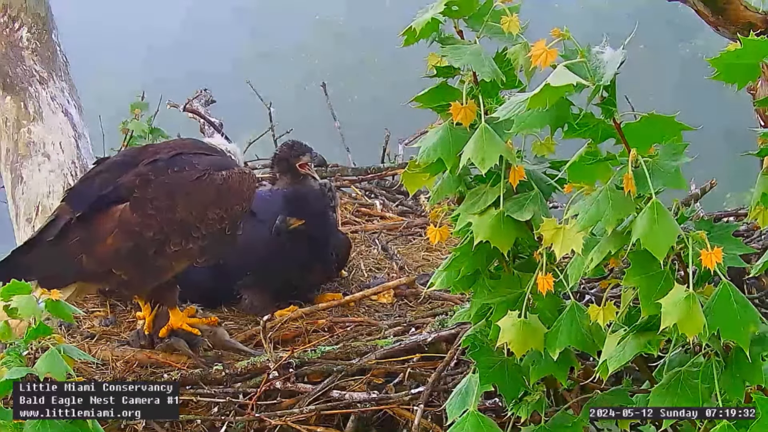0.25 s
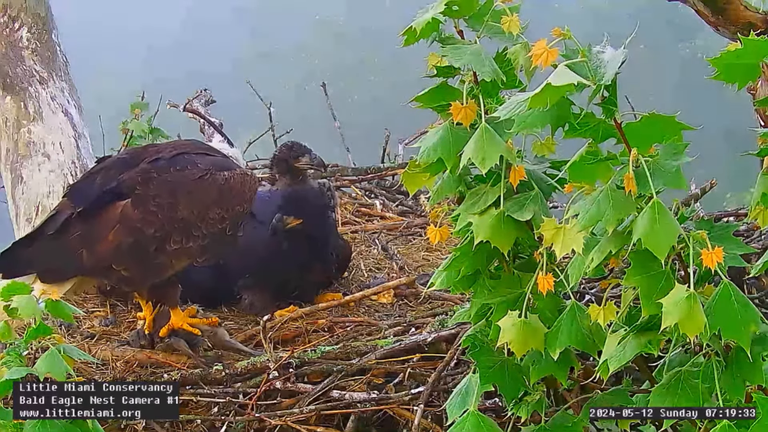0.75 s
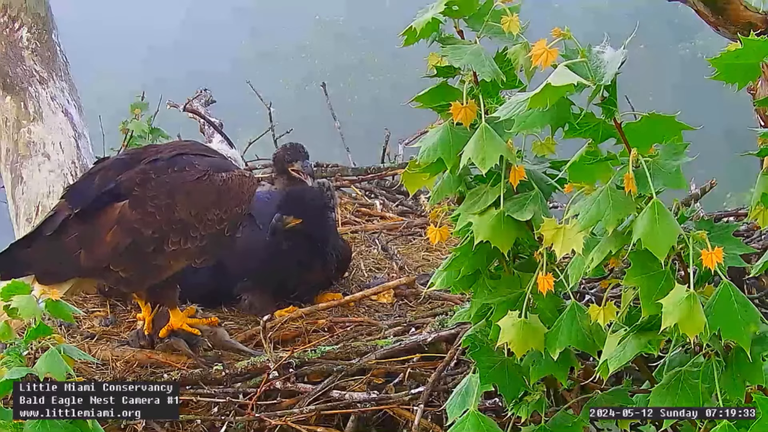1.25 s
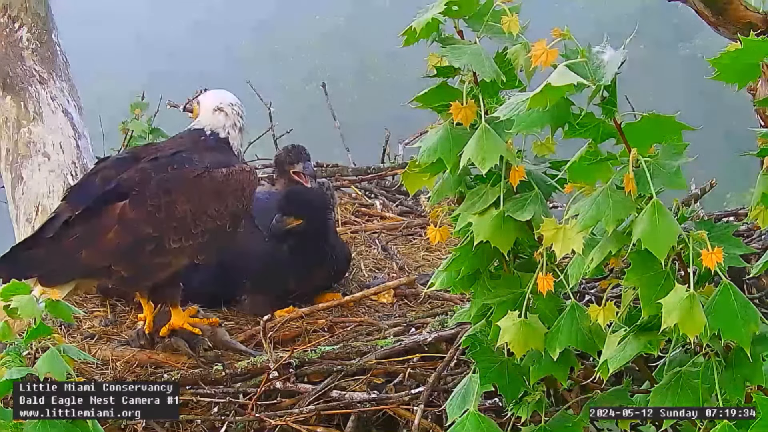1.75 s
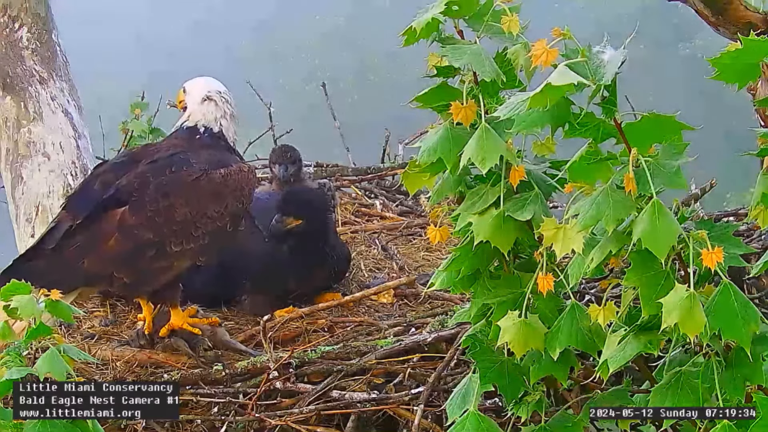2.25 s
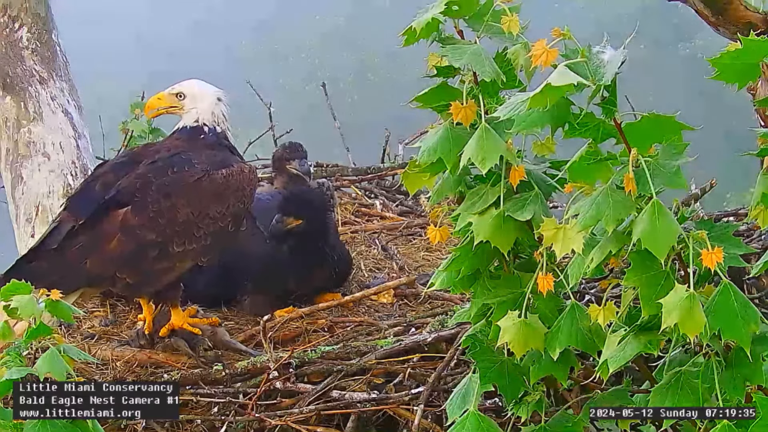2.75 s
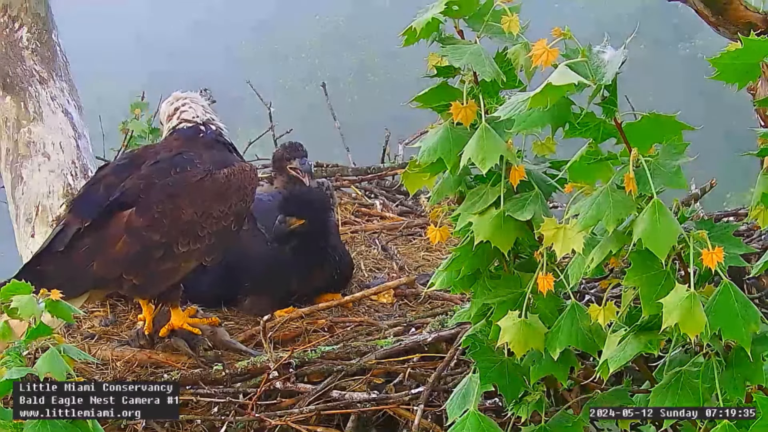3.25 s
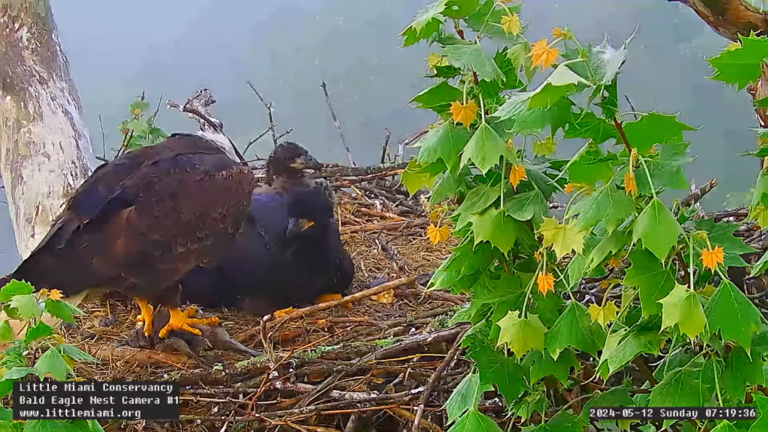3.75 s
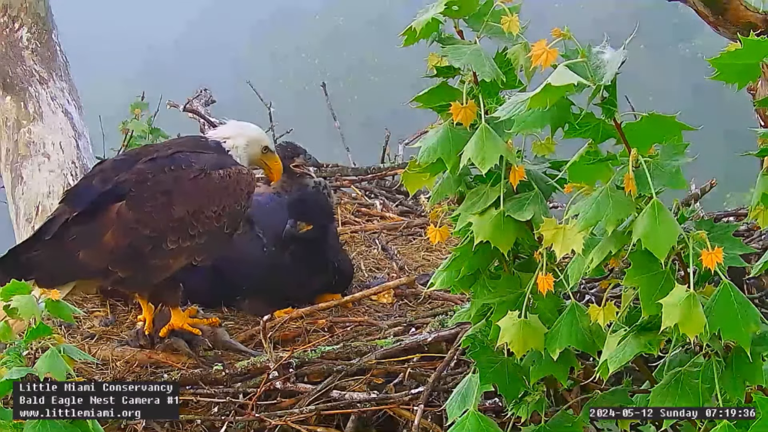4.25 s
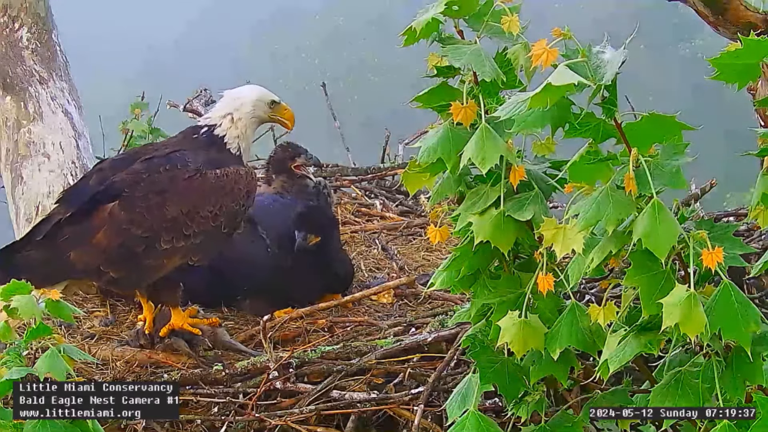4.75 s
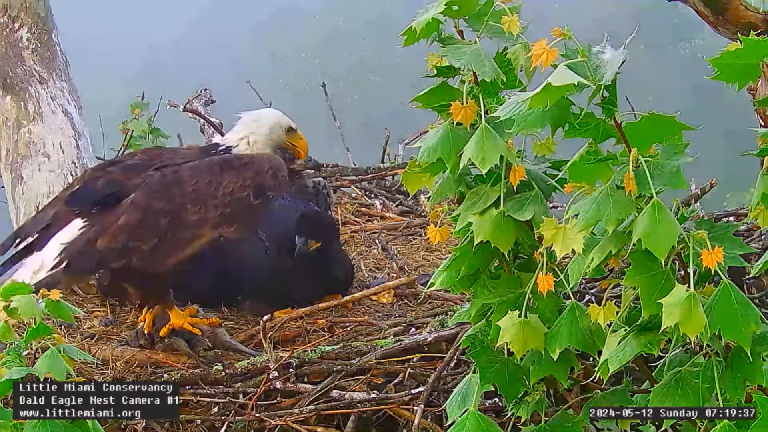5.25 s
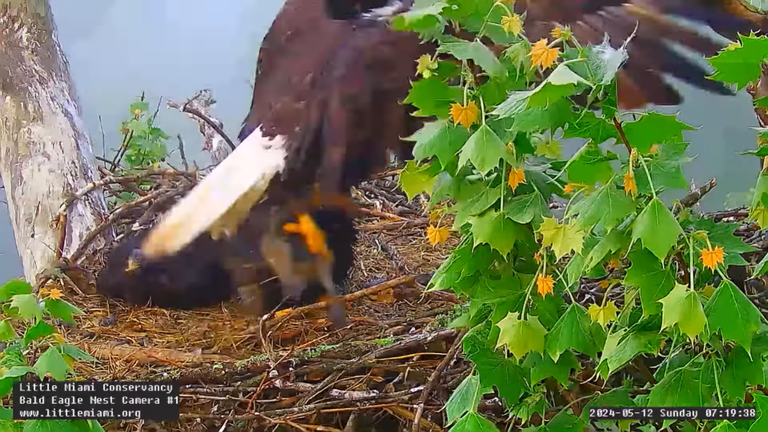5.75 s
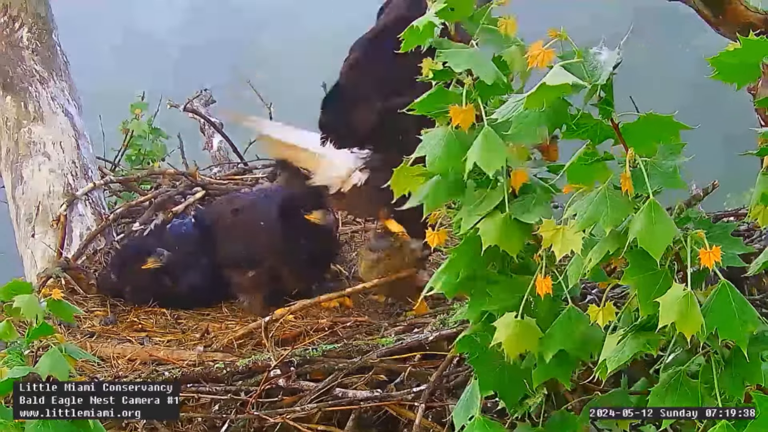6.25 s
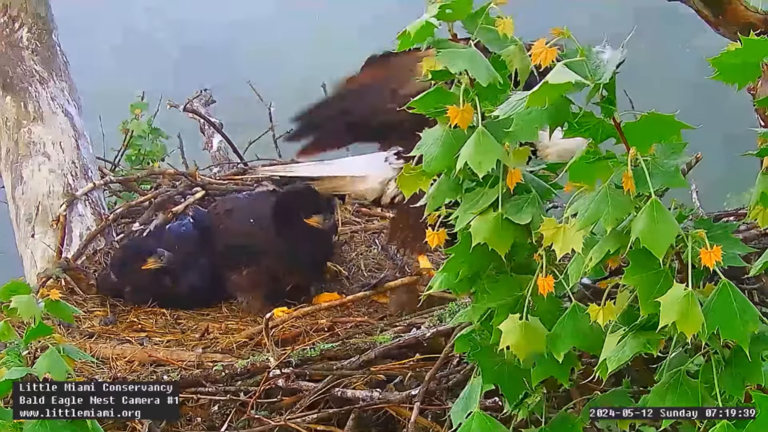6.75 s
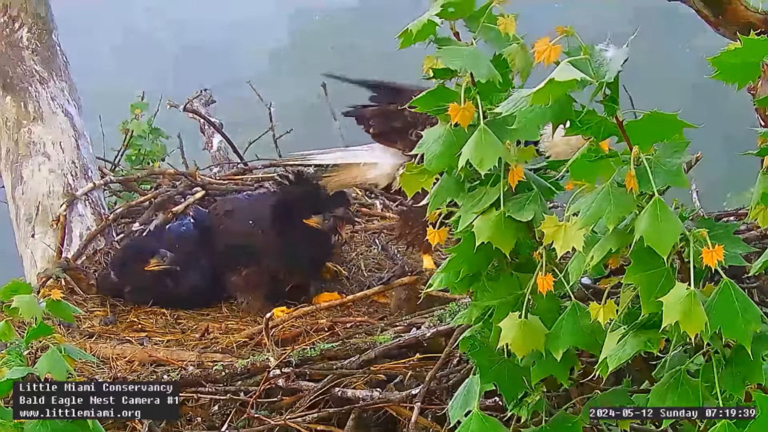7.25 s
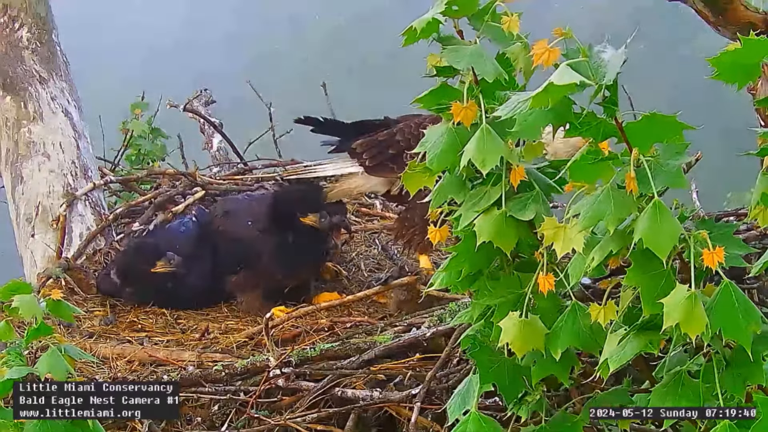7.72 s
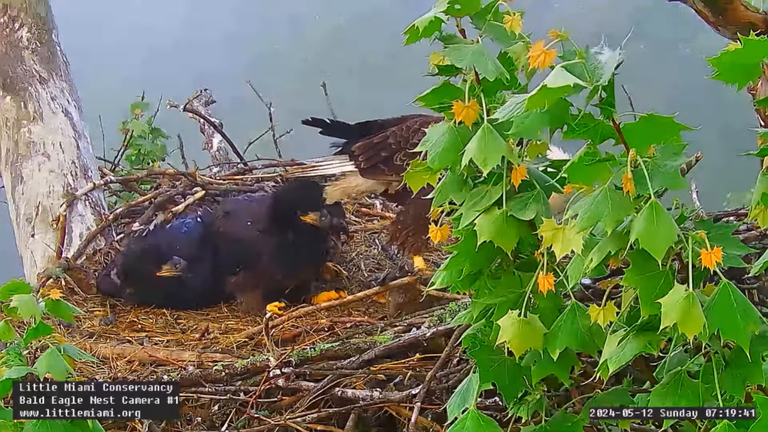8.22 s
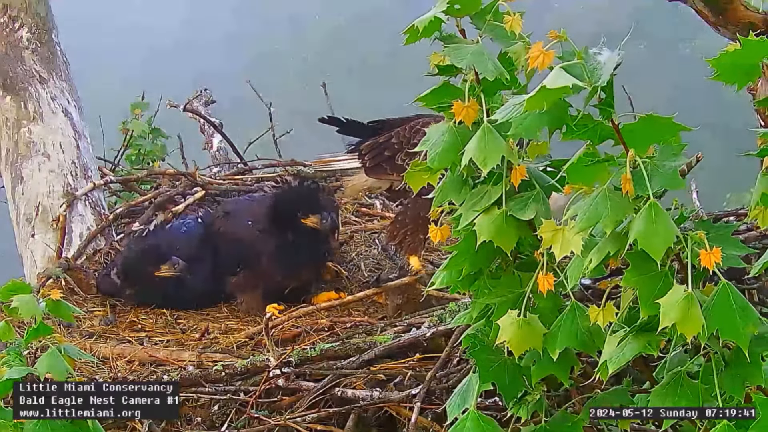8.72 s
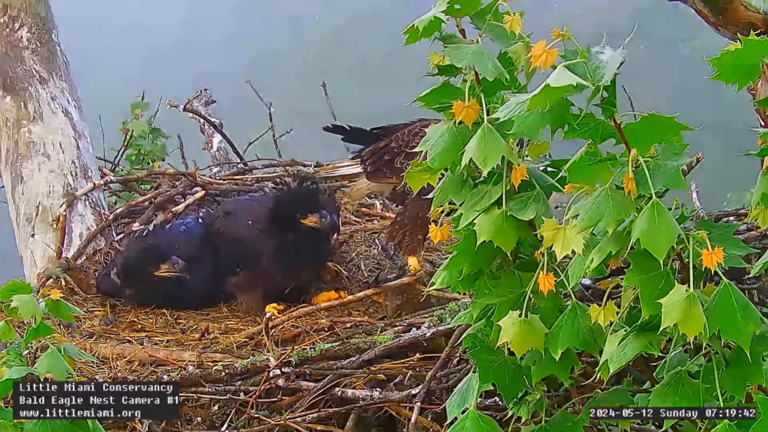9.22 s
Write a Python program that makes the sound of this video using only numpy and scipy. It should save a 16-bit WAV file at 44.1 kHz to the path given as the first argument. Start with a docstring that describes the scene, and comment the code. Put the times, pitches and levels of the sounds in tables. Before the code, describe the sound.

A falling eaglet cry opens, followed by repeated bursts of beating, squealing notes, long whines and held cries that drop abruptly. A quick songbird trill rings lightly through the trees around the middle. Small crisp scrapes of talons on twigs follow, then louder, hoarser screams overlap and push higher. Everything is outdoors, the eagles close to the microphone, with a very soft hiss of leaves behind.

```python
"""Young eagles beg from a treetop nest, opening on a plunging cry: short glides and upward cracks lead into
beating two-voiced notes, long whines and held cries. Past four seconds a small songbird trills in the wood.
Later an adult bird scuffs the nest's sticks, and four raspy screams climb to the end.
Calls are wavering sine tones with noisy sidebands, the trill is quick downward sweeps, the scuffs are shaped
noise; a faint hiss of foliage runs under it all, and the nest microphone cuts the extreme treble."""
import sys
import numpy as np
from scipy import signal
from scipy.fft import rfft, irfft, next_fast_len
from scipy.io import wavfile
from scipy.ndimage import uniform_filter1d, map_coordinates

SR = 44100
rng = np.random.default_rng(int(sys.argv[2]) if len(sys.argv) > 2 else 0)


def inscribe(sig):
    """Save sig as 16-bit PCM at rate SR to the path in sys.argv[1].

    A 1-D sig is mono; a 2-D sig holds one channel per row.
    Samples are clipped to [-1, 1] before scaling.
    """
    pcm = np.round(np.clip(np.atleast_2d(sig).T, -1, 1) * 32767)
    wavfile.write(sys.argv[1], SR, pcm.astype(np.int16))


N = 418068

# Slow level of the foliage hiss. Each row: time in seconds, level in dB before the hiss gain.
HISS_LEVELS = [(0, -67.5), (.36, -74), (.7, -70), (1.7, -69), (2.401, -65.5), (3.201, -69), (4.198, -65.5),
               (5.203, -65), (6.501, -64), (7.499, -70.5), (8.1, -63), (8.598, -71.5), (9.48, -70)]
# Colour of the foliage hiss. Each row: frequency in Hz, relative density in dB per Hz.
HISS_SPECTRUM = [(20, -25.5), (55, -16), (130, -35), (550, -43.5), (1000, -35), (1300, -37), (1700, -18.5),
                 (2200, -9), (3100, -5.5), (4500, -8.5), (6000, -0.5), (7600, 1), (8400, -14.5)]
# How long the trees' echo rings. Each row: frequency in Hz, time to fall 60 dB in seconds.
WOOD_DECAY = [(2000, 0.27), (5000, 0.44), (9000, 0.071)]
# Path of the songbird's trill. Each row: time in seconds, centre of the sweep in Hz.
TRILL_PITCH = [(4.2, 5070), (4.32, 5320), (4.44, 5720), (4.55, 6320), (4.85, 6440), (5.06, 6370)]
# Wings and talons scuffing the sticks. Each row: peak time in seconds, level in dB,
# time from the peak down to 1/e in seconds.
SCUFFS = [(6.404, -56, 0.055), (6.487, -39.5, 0.017), (6.534, -52, 0.023), (6.642, -52, 0.022),
          (6.97, -51, 0.025), (7.254, -48, 0.036)]
# Colour of the dry sticks. Each row: frequency in Hz, relative density in dB per Hz.
STICK_SPECTRUM = [(500, -54), (950, -39.5), (1400, -35.5), (1900, -15), (2250, 3.5), (2800, -7),
                  (3600, 1.5), (8000, -23)]
# Cracked upward slurs that open the calls. Each row: start in seconds, length in seconds, first pitch in Hz,
# last pitch in Hz, fundamental in dB, octave in dB, fade over the note in dB (negative grows).
YELPS = [ (0.43, 0.035, 3220, 4050, -74, -39, 11), (0.518, 0.17, 3650, 3800, -43.5, -45.5, 6),
         (1.853, 0.035, 3110, 4120, -65, -37, 9), (1.954, 0.056, 3686, 3830, -36.5, -30.5, 2),
         (3.238, 0.054, 3200, 3980, -80, -38, 11.5), (3.281, 0.26, 3245, 3740, -40.5, -29, 27.5),
         (3.517, 0.13, 3680, 3934, -43, -45, -1), (4.735, 0.36, 3665, 3800, -56, -42.5, 3),
         (6.196, 0.185, 3594, 3870, -50, -42, 1.5), (7.626, 0.061, 3460, 3950, -43, -44.5, -2.5),
         (8.709, 0.026, 3250, 3390, -44.5, -46.5, 4.5), (8.727, 0.13, 3010, 3460, -45, -60, -9),
         (8.843, 0.063, 3303, 3680, -25, -25, 16.5), ]
# Both syrinx sides sounding together. Each row: start in seconds, length in seconds, first pitch in Hz,
# last pitch in Hz, level in dB, trend in dB per second, attack in seconds, gap between the sides in Hz, rasp 0-1.
DUETS = [ (0.0, 0.29, 4635, 4380, -45.5, -65, 0.00067, 672, 0.76),
         (0.51, 0.57, 3910, 4575, -29.5, -2, 0.1, 210, 0.23),
         (2.0, 0.32, 4077, 4540, -31, 5.5, 0.0049, 203.1, 0.52),
         (3.6, 0.42, 4230, 4623, -37, 14.5, 0.026, 203, 0.25),
         (4.57, 0.35, 3074, 3500, -42.5, 3, 0.11, 201, 0.08),
         (4.88, 0.24, 3485, 3880, -45.5, -10.5, 0.012, 297, 0.06),
         (4.89, 0.63, 4116, 4786, -34.5, 4, 0.09, 265, 0.27),
         (8.92, 0.71, 4150, 4650, -37, -29.5, 0.02, 270, 0.18), ]
# Short glides between and within the calls, some soft, some loud or hoarse: peeps, call ends and upper strands.
# Each row: start in seconds, length in seconds, first pitch in Hz, last pitch in Hz,
# mid-note level in dB, rasp 0-1.
SHORT_GLIDES = [ (0.467, 0.12, 4060, 4030, -51, 0.34), (1.05, 0.1, 4920, 4820, -42.5, 0.55),
                (1.146, 0.08, 4650, 4594, -31.5, 0.63), (1.548, 0.12, 4050, 3270, -58.5, 0.7),
                (1.691, 0.14, 3250, 2950, -56, 0.45), (1.807, 0.41, 3200, 3490, -49.5, 0.38),
                (1.893, 0.15, 4070, 4250, -46.5, 0.25), (2.124, 0.084, 3650, 3030, -48.5, 0.8),
                (2.296, 0.12, 3020, 3490, -46.5, 0.5), (2.266, 0.14, 4580, 4760, -37, 0.27),
                (2.354, 0.13, 2850, 2286, -63.5, 0.4), (3.562, 0.038, 3800, 3225, -30.5, 0.17),
                (5.722, 0.18, 2520, 2850, -57, 1), (6.019, 0.42, 3130, 2913, -55.5, 1),
                (6.08, 0.12, 4150, 4240, -43, 0.11), (6.286, 0.035, 3950, 2910, -39.5, 0.44),
                (6.33, 0.32, 3500, 3850, -48, 1), (6.653, 0.13, 6010, 5500, -44, 0.68),
                (6.798, 0.15, 3150, 3170, -47, 0.37), (6.893, 0.27, 5200, 5390, -46, 0.5),
                (7.011, 0.11, 3180, 3530, -37, 0.47), (7.051, 0.13, 5450, 5950, -39, 0.2),
                (7.104, 0.15, 3850, 4190, -42.5, 0.5), (7.931, 0.26, 5350, 6300, -43, 0.1),
                (7.925, 0.18, 5250, 5400, -36, 1), (8.236, 0.05, 2730, 2980, -56.5, 0.82),
                (8.477, 0.028, 3654, 2990, -30, 0.29), (9.123, 0.12, 5200, 5660, -38, 0.33),
                (9.301, 0.24, 3080, 2750, -70, 0.74), ]
# Long thin whines. Each row: start in seconds, length in seconds, first pitch in Hz, last pitch in Hz,
# first level in dB, last level in dB, midway dip in dB, rasp 0-1, final droop in Hz, plunge in seconds.
WHINES = [ (2.585, 0.99, 4223, 4186, -33, -39.5, 11.5, 0.21, 624.5, 0.045),
          (5.441, 0.41, 4240, 4230, -32, -41, -0.5, 0.34, 0.5, 0),
          (5.83, 0.455, 4394, 4197, -43, -42, 11, 0.12, 199, 0.04),
          (7.165, 0.66, 4263, 4567, -30.5, -28, 13.5, 0.27, 1.5, 0),
          (8.836, 0.71, 3560, 3700, -30, -45.5, 7, 0.15, 4, 0.028), ]
# The four long screams, one curve each. Each row of a curve: time in seconds, pitch in Hz, level in dB.
SCREAM_CURVES = [
    [(6.38, 4050, -35.5), (6.43, 4410, -35.5), (6.552, 4230, -40.5), (6.65, 4550, -32.5),
     (6.808, 4690, -35.5), (6.942, 4690, -30.5), (7.134, 4884, -30), (7.184, 4690, -23)],
    [(7.68, 3980, -27.5), (7.72, 4210, -22), (7.746, 4360, -24.5), (7.95, 4640, -21), (8.186, 4580, -36),
     (8.215, 4530, -32)],
    [(7.99, 5220, -33.5), (8.006, 5140, -29.5), (8.068, 5230, -42.5), (8.106, 5481, -24.5),
     (8.114, 5190, -25), (8.192, 5464, -16), (8.348, 5605, -22.5), (8.436, 5430, -20), (8.456, 5219, -27.5)],
    [(8.89, 4220, -33.5), (8.946, 4750, -39), (9.19, 4990, -35), (9.222, 5070, -42), (9.262, 5310, -25),
     (9.388, 5160, -27.5), (9.475, 5344, -27.5)],
]
# Voices of the screams. Each row: register change in seconds, rasp before 0-1, rasp after 0-1,
# side tone pitch as a ratio, side tone level relative to the scream in dB.
SCREAM_VOICES = [(7.159, 0.32, 0.4, 1.15, -13.5), (7.97, 0.12, 0.5, 1.24, -34),
                 (8.15, 0.5, 0.03, 1.178, -20.5), (9.2, 0.37, 0.12, 1.137, -26)]
# The held cry that crowns a begging call. Each row: start in seconds, length in seconds, first pitch in Hz,
# sag in Hz per second, mid-cry level in dB, opening rasp 0-1.
CRIES = [ (0.0, 0.27, 5000, 903, -57, 0.16), (1.168, 0.2385, 4808, 950, -26.5, 0.38),
         (2.412, 0.3205, 4690, 450, -23.5, 0.45), (3.953, 0.172, 4724, 823, -27.5, 0.4),
         (5.403, 0.25, 4842, 456, -28, 0.65), ]

TRILL_START_S, TRILL_COUNT = 4.1987, 18
# the gap between syllables shrinks from slow to fast, half-way by the gap numbered TRILL_HURRY
TRILL_SLOW_S, TRILL_FAST_S, TRILL_HURRY = 0.0602, 0.048, 3.4
TRILL_DB, TRILL_SWELL_DB, TRILL_SWELL_S = -26.5, 12.5, 0.16  # swells towards TRILL_DB
EDGE_DB = 21  # depth of the soft attacks, the duet releases and the side tone's entry
DUET_RELEASE_S = 0.015
EASE = 1.45  # a glide slows as it nears its goal
TAPER_DB = 7  # the ends of a short glide lie this far under its middle
DROOP_S = 0.031  # a whine sinks over its last moments
REGISTER_S = 0.048  # how quickly a scream changes register
CRY_ATTACK_S, CRY_SWELL_DB, CRY_CLEAR_S = 0.0093, 4.5, 0.24  # starts hoarse, clears as it grows
DROP_S = 0.046  # plunge that ends a cry or scream
DROP_TO_HZ, DROP_FADE_DB, DROP_RASP = 2850, 30.5, 0.95  # state at the foot of any plunge
TOP_HZ = 8750  # the microphone's band limit


def amp(db):
    """Decibels to gain."""
    return 10 ** (np.asarray(db) / 20)


def unit(x):
    """x at rms 1."""
    return x / np.sqrt(np.mean(np.abs(x) ** 2) + 1e-20)


def along(points, hz):
    """Read (Hz, value) points on a log frequency axis."""
    f, v = np.transpose(points)
    return np.interp(np.log(hz + 1), np.log(f + 1), v)


def filtered(x, response):
    """Shape the spectrum of x by a response of frequency."""
    m = next_fast_len(N + 8192)
    return irfft(rfft(x, m) * response(np.fft.rfftfreq(m, 1 / SR)), m)[:N]


def noise(spectrum):
    """Coloured noise of rms 1."""
    return unit(filtered(rng.standard_normal(N), lambda hz: amp(along(spectrum, hz))))


def wobble(rate, n):
    """A smooth random curve of n samples, with rate knots a second."""
    return map_coordinates(rng.standard_normal(int(n * rate / SR) + 4), [np.arange(n) * rate / SR])


def add(out, s, sound):
    """Mix a sound into out at time s."""
    part = out[max(round(s * SR), 0):][:len(sound)]
    part += sound[:len(part)]


def foliage(level_db=10):
    """The wood's faint hiss: coloured noise whose level slowly shifts and lightly flutters."""
    db = np.interp(np.arange(N) / SR, *np.transpose(HISS_LEVELS))
    drift_db = 0.9 * wobble(9, N)
    return amp(level_db + db + drift_db) * noise(HISS_SPECTRUM)


def echo(x, delay=0.0027):
    """Scatter from trunks and leaves: a noise tail in which each frequency dies at its own speed."""
    hz, t, z = signal.stft(rng.standard_normal(SR // 2), SR, nperseg=256)
    decay = amp(-60 * t / along(WOOD_DECAY, hz)[:, None])
    tail = signal.istft(z * decay, SR, nperseg=256)[1]
    tail = np.pad(tail / np.linalg.norm(tail), (round(delay * SR), 0))
    return signal.fftconvolve(x, tail)[:N]


def syllables():
    """The trill quickens and swells: time in seconds and level in dB of each syllable."""
    slowness = 1 / (1 + (np.arange(TRILL_COUNT - 1) / TRILL_HURRY) ** 4)
    gaps = TRILL_FAST_S + (TRILL_SLOW_S - TRILL_FAST_S) * slowness
    t = np.append(0, np.cumsum(gaps))
    return zip(TRILL_START_S + t, TRILL_DB - TRILL_SWELL_DB * np.exp(-t / TRILL_SWELL_S))


def songbird(half_sweep_hz=1836, half_length=0.0065, scatter_s=0.007, scatter_db=-3, wet_db=-0.5):
    """A trill of very quick downward sweeps, blurred by nearby leaves and by the wood."""
    out = np.zeros(N)
    u = np.linspace(-1, 1, round(2 * half_length * SR))
    swell = np.cos(np.pi / 2 * u) ** 4
    t = np.arange(SR // 40) / SR
    for s, db in syllables():
        hz = np.interp(s, *np.transpose(TRILL_PITCH)) - half_sweep_hz * u
        sweep = swell * np.sin(2 * np.pi * np.cumsum(hz) / SR)
        leaves = rng.standard_normal(len(t)) * np.exp(-t / scatter_s)
        paths = (t == 0) + amp(scatter_db) * leaves / np.linalg.norm(leaves)  # direct sound, then scatter
        # the sweep is centred 3 ms after the syllable's time
        add(out, s - half_length + 0.003, amp(db) * signal.fftconvolve(sweep, paths))
    return out + amp(wet_db) * echo(out)


def scuffs(grain_db=4):
    """Each stroke drags over dry sticks: a bell-shaped swell of grainy coloured noise."""
    t = np.arange(N) / SR
    strokes = sum(amp(db) * np.exp(-((t - s) / length) ** 2) for s, db, length in SCUFFS)
    grain = amp(grain_db * wobble(300, N))
    return strokes * unit(noise(STICK_SPECTRUM) * grain)


def clock(length):
    """A note's time in seconds and its progress 0-1, per sample."""
    t = np.arange(round(length * SR)) / SR
    return t, t / length


def gate(n):
    """Soft 4 ms edges for a note of n samples."""
    t = np.arange(n) / SR
    return np.sin(np.pi / 2 * np.clip(np.minimum(t, t[-1] - t) / 0.004, 0, 1)) ** 2


def glide(first, last, u):
    """Pitch moves fast at first and eases into its goal."""
    return last + (first - last) * (1 - u) ** EASE


def membrane(hz, rasp, waver, jitter, flutter_db, shimmer_db=7):
    """Phase and strength of one syrinx side; rasp makes both tremble quickly, and the swing saturates."""
    n = len(hz)
    pitch = hz * (1 + waver * wobble(110, n) + jitter * rasp * wobble(650, n))
    drive = amp(flutter_db * wobble(45, n) + shimmer_db * rasp * wobble(380, n))
    strength = np.sqrt(2) * np.tanh(drive) / np.tanh(1)
    return 2 * np.pi * np.cumsum(pitch) / SR, strength


def screech(phase, rasp, near_db, side_db, near_hz=330, side_hz=360, above_hz=720, step_db=-11):
    """Chaotic vibration: a noisy skirt hugs the note, and two ragged sidebands stand above it."""
    n = len(phase)

    def grit(rate):
        return wobble(rate, n) + 0.6 * wobble(3 * rate, n)

    def band(rate, p):
        return grit(rate) * np.cos(p) + grit(rate) * np.sin(p)

    flap = 2 * np.pi * np.cumsum(above_hz * (1 + 0.18 * wobble(90, n))) / SR
    sides = band(side_hz, phase + flap) + amp(step_db) * band(side_hz, phase + 2 * flap)
    return rasp * (amp(near_db) * band(near_hz, phase) + amp(side_db) * sides)


def octave(phase, hz):
    """The second harmonic, which the throat passes only while the note is low."""
    return np.sin(2 * phase) / (1 + (hz / 3950) ** 60)


def yelps(rasp=0.29, other_ratio=1.109, other_db=-12):
    """The voice cracks upward: the octave often outshouts the fundamental; the other side adds a hoarse octave."""
    out = np.zeros(N)
    for start, length, first, last, db, octave_db, fade_db in YELPS:
        _, u = clock(length)
        hz = first + (last - first) * u
        phase, strength = membrane(hz, rasp, waver=0.004, jitter=0.035, flutter_db=4.5, shimmer_db=19)
        other, other_strength = membrane(hz * other_ratio, rasp, waver=0.004, jitter=0.04,
                                         flutter_db=4, shimmer_db=25)
        fundamental = strength * np.sin(phase)
        octaves = strength * np.sin(2 * phase) + amp(other_db) * other_strength * np.sin(2 * other)
        voice = amp(db) * fundamental + amp(octave_db) * octaves
        add(out, start, gate(len(u)) * amp(-fade_db * u) * voice)
    return out


def two_voiced(upper_db=-1, octave_db=-22, coupled_db=-18, wander_hz=45, gap_wander=0.19, waver=0.009):
    """The two sides sing a little apart and stray quickly, so the note beats unevenly and buzzes."""
    out = np.zeros(N)
    for start, length, first, last, held_db, trend, attack, apart, rasp in DUETS:
        t, u = clock(length)
        hz = glide(first, last, u) + wander_hz * wobble(18, len(t))
        gap = apart * (1 + gap_wander * wobble(11, len(t)))
        edges = np.exp(-t / attack) + np.exp((t - length) / DUET_RELEASE_S)
        db = held_db + trend * t - EDGE_DB * edges
        low, low_strength = membrane(hz - gap / 2, rasp, waver, jitter=0.03, flutter_db=4)
        high, high_strength = membrane(hz + gap / 2, rasp, waver, jitter=0.025, flutter_db=1)
        lower = low_strength * (np.sin(low) + amp(octave_db) * octave(low, hz))
        upper = amp(upper_db) * high_strength * np.sin(high)
        # the sides modulate each other
        coupled = amp(coupled_db) * (np.sin(2 * high - low) + 0.5 * np.sin(2 * low - high))
        rough = screech(high, rasp, near_db=1, side_db=-10.5)
        add(out, start, gate(len(t)) * amp(db) * (lower + upper + coupled + rough))
    return out


def with_drop(hz, db, rasp, length):
    """Finish a note with the plunge: pitch falls straight down, the level gives way and the voice roughens."""
    _, u = clock(length)
    return (np.append(hz, hz[-1] + (DROP_TO_HZ - hz[-1]) * u),
            np.append(db, db[-1] - DROP_FADE_DB * u ** 1.72),
            np.append(rasp, rasp[-1] + (DROP_RASP - rasp[-1]) * u))


def short_glides():
    """Peeps, call ends and upper strands are each one glide under an arch of level."""
    notes = []
    for start, length, first, last, db, rasp in SHORT_GLIDES:
        _, u = clock(length)
        notes.append((start, glide(first, last, u), db - TAPER_DB * (2 * u - 1) ** 2, rasp))
    return notes


def whines(wander_hz=30):
    """A whine wanders around a glide, and most thin out midway and recover; some then droop and plunge."""
    notes = []
    for start, length, first, last, first_db, last_db, dip_db, rasp, droop, plunge in WHINES:
        t, u = clock(length)
        sinking = droop * np.exp((t - length) / DROOP_S)
        hz = glide(first, last, u) + wander_hz * wobble(31, len(t)) - sinking
        level = first_db + (last_db - first_db) * u - dip_db * np.sin(np.pi * u)
        notes.append((start, *with_drop(hz, level, np.full(len(t), rasp), plunge)))
    return notes


def screams():
    """A scream climbs, changes register and plunges; with the change a weaker side tone comes up above it."""
    notes = []
    for curve, (change, before, after, ratio, side_db) in zip(SCREAM_CURVES, SCREAM_VOICES):
        s, pitch, level = np.transpose(curve)
        t = s[0] + clock(s[-1] - s[0])[0]
        register = (1 + np.tanh((t - change) / REGISTER_S)) / 2
        hz = np.interp(t, s, pitch)
        db = np.interp(t, s, level)
        rasp = before + (after - before) * register
        side_level = db + side_db - EDGE_DB * (1 - register)
        notes.append((s[0], *with_drop(hz, db, rasp, DROP_S)))
        notes.append((s[0], *with_drop(hz * ratio, side_level, rasp, DROP_S)))
    return notes


def cries():
    """A cry sags in pitch, swells and clears, then plunges."""
    notes = []
    for start, length, hz, sag, db, rasp in CRIES:
        t, u = clock(length)
        level = db + CRY_SWELL_DB * (u - 0.5) - EDGE_DB * np.exp(-t / CRY_ATTACK_S)
        clearing = rasp * np.exp(-t / CRY_CLEAR_S)
        notes.append((start, *with_drop(hz - sag * t, level, clearing, DROP_S)))
    return notes


def whistles(octave_db=-19, drop_db=10, drop_hz_per_s=25000):
    """One side of the syrinx sings a nearly pure tone; where its pitch plunges, the octave flares."""
    out = np.zeros(N)
    for start, hz, db, rasp in cries() + whines() + screams() + short_glides():
        fall = -uniform_filter1d(np.gradient(hz), size=200) * SR  # Hz per second
        dropping = np.clip(fall / drop_hz_per_s, 0, 1)
        phase, strength = membrane(hz, rasp, waver=0.0022, jitter=0.028, flutter_db=3.5, shimmer_db=16)
        overtone = amp(octave_db + drop_db * dropping) * octave(phase, hz)
        tone = strength * (np.sin(phase) + overtone)
        rough = screech(phase, rasp, near_db=-6, side_db=-9.5)
        add(out, start, gate(len(hz)) * amp(db) * (tone + rough))
    return out


def scene():
    """Close eaglets and sticks, almost dry, in front of the wood."""
    nest = whistles() + two_voiced() + yelps() + scuffs()
    return (nest + amp(-31) * echo(nest) + songbird() + foliage())[None]


def record(dry):
    """The nest microphone cuts off steeply above its band limit."""
    return filtered(dry[0], lambda hz: 1 / np.sqrt(1 + (hz / TOP_HZ) ** 160))[None]


dry = scene()
out = record(dry)
inscribe(out)
```